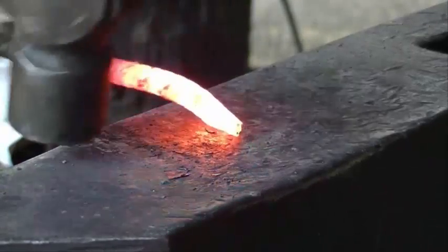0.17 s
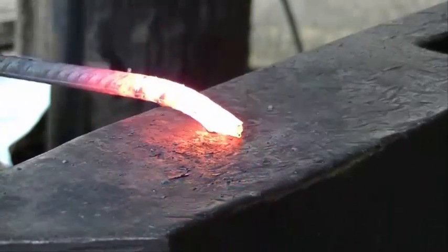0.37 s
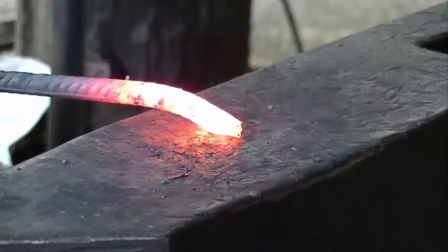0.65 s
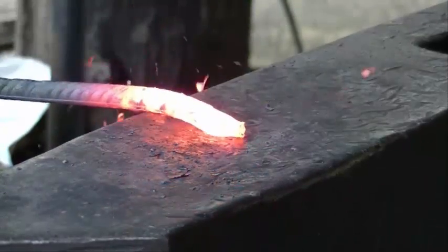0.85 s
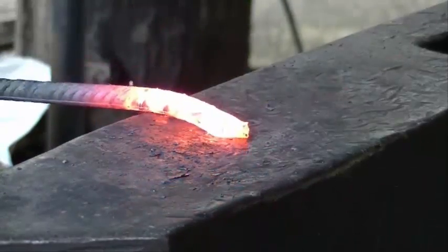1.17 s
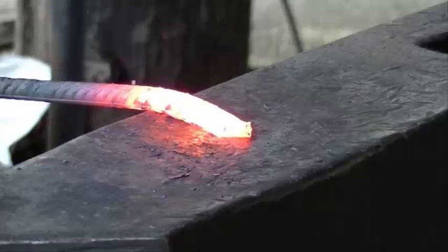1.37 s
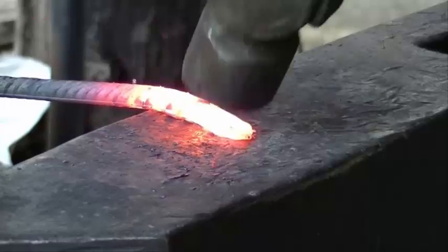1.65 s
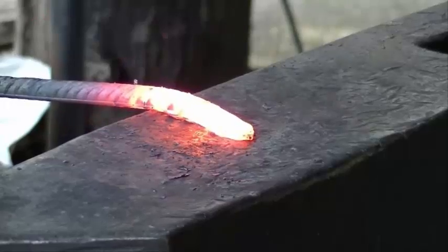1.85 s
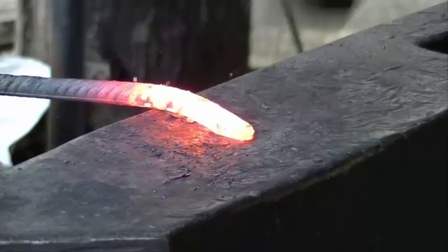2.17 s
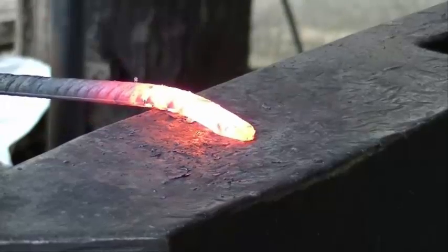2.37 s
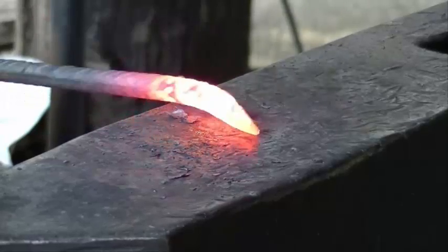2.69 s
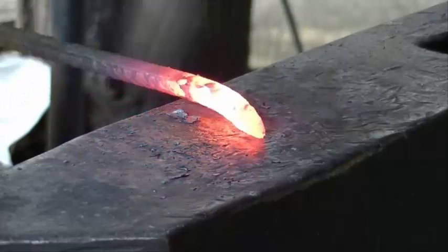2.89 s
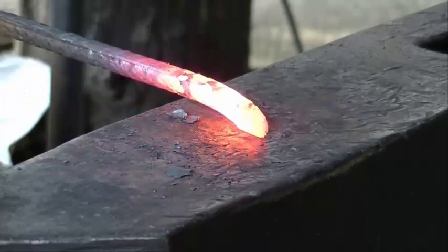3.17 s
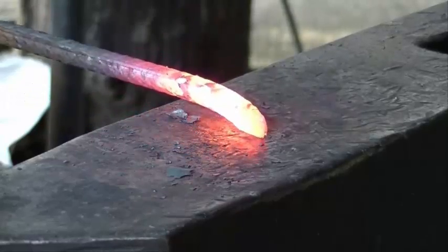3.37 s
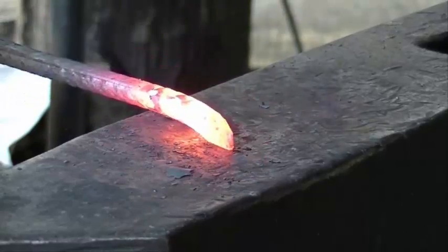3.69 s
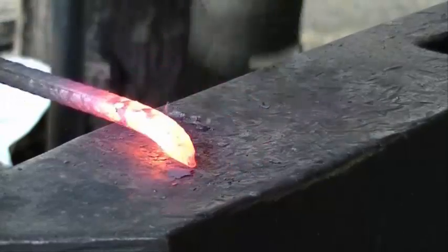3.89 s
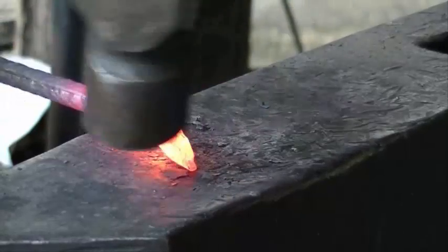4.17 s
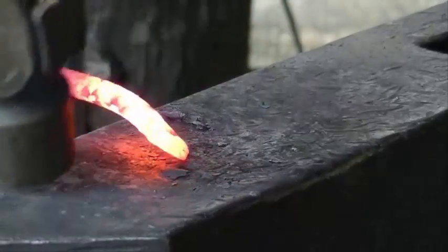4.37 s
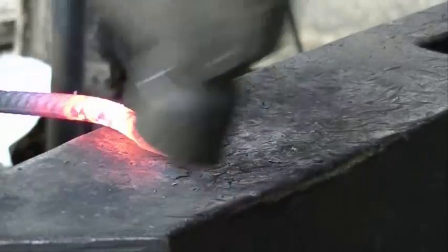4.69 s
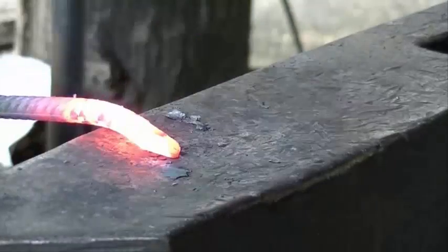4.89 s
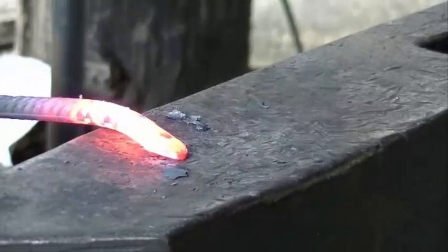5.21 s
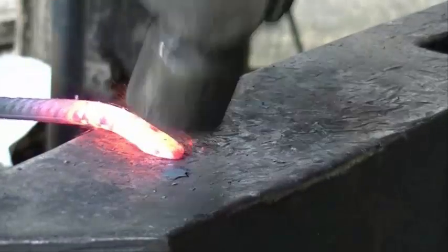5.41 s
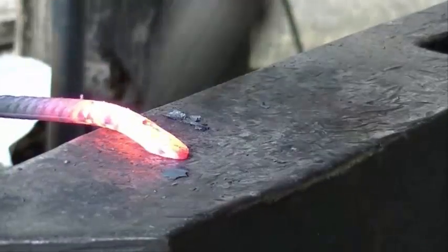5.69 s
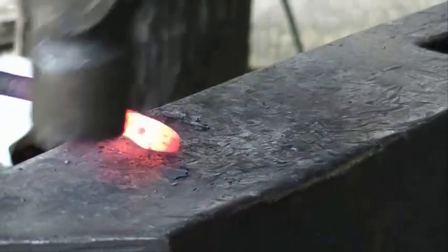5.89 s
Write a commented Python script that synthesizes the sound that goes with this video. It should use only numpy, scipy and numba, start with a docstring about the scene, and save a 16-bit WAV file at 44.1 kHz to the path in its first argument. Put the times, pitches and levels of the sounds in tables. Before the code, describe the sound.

Close to an anvil in a small forge, a hand hammer beats a hot steel bar. After two light taps come nine rhythmic blows, some dull and knocking, some sharp and bright, with brief metallic ringing and small clicks of the bar between them. The hammer chatters on the bare anvil, pauses, then strikes three more times and taps once. A low-level steady rush of fire runs underneath.

```python
"""Two light hammer taps ring on a bare anvil; then a smith draws out a red-hot bar in a small forge.
Each blow snaps, clanks and rings anvil and hammer. The bar clinks as it is turned, the hammer now and
then bounces on the bare face, and the blown fire rushes behind.
The stereo microphone stands close. Its limiter ducks on every hard snap and recovers as fast as the
clank dies, so those blows seem to hang."""
import sys
import numpy as np
from scipy import signal
from scipy.fft import rfft, irfft, next_fast_len
from scipy.io import wavfile
from numba import njit

SR = 44100
rng = np.random.default_rng(int(sys.argv[2]) if len(sys.argv) > 2 else 0)


def wav_record(signal):
    """Record a signal, one row per channel, as 16-bit PCM in the file named by sys.argv[1]."""
    frames = np.transpose(np.atleast_2d(signal))
    bounded = np.clip(frames, -1, 1)
    # unit amplitude maps onto the largest positive 16-bit level
    quanta = np.round(bounded * 32767).astype(np.int16)
    wavfile.write(sys.argv[1], SR, quanta)


N = 266805

# blows on the hot bar: start_s, force_db, softness (0-1), face_ring_db, hammer_ring_db
BAR_BLOWS = [ (0.7675, 10, 0.75, -14, -0.5), (1.218, 12.5, 0.58, -10.5, -0.5), (1.6643, 3.5, 0.84, -18, -3),
             (2.1124, 17, 0.19, -12, -3), (2.5525, 19, 0.22, -17, 3), (2.950, 15.5, 0, -4.5, -5.5),
             (3.435, 1.5, 1, -17, -35), (3.83, 0, 1, -14, -8.5), (4.1245, -3.5, 0.84, -26, -12),
             (5.0662, 18, 0.07, -9, -2.5), (5.4128, 6.5, .55, -9.5, -8.5), (5.7422, 5.5, .45, -22, -0.5)]
# the hammer bouncing on the bare face: start_s, force_db, heel_nearness (0-1), hammer_ring_db
FACE_TAPS = [(.158, -1, 0.18, -7), (.239, -6, 0, -17), (4.3009, -1.5, 0.93, 0), (4.383, -3.5, 0.8, -7.5),
             (4.4313, -5, 0.7, -12.5), (4.4654, -13, 0.8, -20), (4.4843, -12, 0, -20),
             (4.503, -31, 0.3, -16), (5.9707, -4, 0.86, -2)]
# short bright clicks, the bar touching the anvil and one hammer rebound just after a blow:
# start_s, level_db, t60_s
BRIGHT_CLICKS = [(0.511, -31.5, 0.15), (.648, -16, 0.03), (0.653, -17.5, 0.055), (1.033, -27, 0.26),
                 (1.072, -37, 0.043), (2.759, -29, 0.027), (3.189, -33.5, 0.053), (3.45, -7, 0.03)]
# modes of the anvil's body, heel and face, the hammer head and the hot bar: pitch_hz, level_db
BODY_MODES = [(937, -16), (1042, -14), (1396, -15), (1470, -15), (1690, -13), (1890, -13), (1911, -5),
              (2495, -21), (4365, -22)]
HEEL_MODES = [(2747, -9), (2815, -13), (3160, -6), (3190, -12), (3785, -17)]
FACE_MODES = [(4935, -12), (5497, -7), (5750, -10), (5860, -13), (6638, 0), (7343, -8), (7780, -14),
              (8905, -19), (9110, -20), (9440, -19)]
HAMMER_MODES = [(8204, -10), (8232, -6), (10500, -20)]
BAR_MODES = [(940, 5), (2810, 2.5), (3740, -1), (4350, -4), (5440, 2), (5630, 6), (6220, 4), (7300, -1),
             (9400, -1)]
# noise spectra of the clank, the bright clicks and the fire: frequency_hz, density_db
CLANK_SPECTRUM = [(30, -4.5), (160, -16), (380, -13.5), (620, 0), (950, 1.5), (1750, 10), (2700, 7),
                  (4100, 5.5), (5300, 4), (8100, -1), (11000, 1)]
CLICK_SPECTRUM = [(100, -3), (700, -1), (2000, 7.5), (3500, 3.5), (7000, 5.5), (11000, 2)]
FIRE_SPECTRUM = [(30, -11), (100, -30), (170, -17), (250, -12.5), (400, -5.5), (660, 0.5), (1100, -3.5),
                 (2000, -4.5), (2800, -9.5), (5000, -15), (11000, -25)]
# stereo width of room and fire at the microphone: frequency_hz, side_against_mid_db
ROOM_WIDTH = [(150, -13), (700, -25.5), (2500, -17), (5000, -14), (10000, -3)]
FIRE_WIDTH = [(100, -2), (250, -15), (1000, -21), (3000, -16), (6000, -7), (10000, -3)]

TOP_HZ = 10900  # treble cut-off
AGE = np.arange(SR // 3) / SR  # seconds since a contact


def bar_blow(force_db, softness, face_db, hammer_db):
    """A blow on the hot bar: soft steel thuds, knocks and sheds scale, and it damps the anvil."""
    return strike(
        force_db, face_db, hammer_db,
        kick_hz=2310 - 1240 * softness,  # longer contact lowers the pitch
        thud_db=4 + 11 * softness, knock_db=-2.5 + 12 * softness, bright_db=-6 + 7 * softness,
        body_db=2 - 4.5 * softness, heel_db=-11 - 6 * softness, bar_db=-15 + 12 * softness)


def face_tap(force_db, heel_nearness, hammer_db):
    """Hammer on bare anvil: the face rings with the hammer, and the thin heel sings when struck near."""
    return strike(
        force_db, face_db=hammer_db - 6, hammer_db=hammer_db, kick_hz=2310,
        thud_db=5.5, knock_db=7.5, bright_db=-16,
        body_db=3, heel_db=-4 + 12 * heel_nearness, bar_db=-np.inf)


def strike(force_db, face_db, hammer_db, kick_hz, thud_db, knock_db, bright_db,
           body_db, heel_db, bar_db):
    """Close by: the snap of the stopped hammer, then a diffuse clank with the clear rings of steel."""
    # soft hot steel passes a longer push to the anvil stand; crushed scale adds treble
    push = [(450, thud_db), (1100, knock_db), (2400, 0), (3900, 0)]
    snap_tone = [(200, 7.8)] + push + [(5700, bright_db / 2 - 0.5), (10000, bright_db / 2 - 6)]
    clank_tone = push + [(5300, bright_db)]
    cycles = kick_hz * AGE
    kick = undb(8.5) * cycles * np.exp(-cycles / 0.91) * np.sin(2 * np.pi * cycles)
    crack = undb(-5.5) * colour(wash(CLANK_SPECTRUM) * fade(t60_s=0.05), snap_tone)
    # the hammer head rings hardest in the first moment
    ping = undb(hammer_db + 1.5) * ring(HAMMER_MODES, t60_s=0.042, spread=0.19)
    # crowded modes merge with the wall reflections
    partials = undb(-21) * ring(crowded_modes(), t60_s=0.18, spread=0.75)
    clank = colour(wash(CLANK_SPECTRUM) * fade(t60_s=0.19) + partials, clank_tone)
    anvil = (undb(body_db) * ring(BODY_MODES, t60_s=0.19, spread=0.8)
             + undb(heel_db) * ring(HEEL_MODES, t60_s=0.16, spread=0.5)
             + undb(face_db) * ring(FACE_MODES, t60_s=0.21, spread=0.5))
    bar = undb(bar_db) * ring(BAR_MODES, t60_s=0.075, spread=0.7)
    hammer = undb(hammer_db) * ring(HAMMER_MODES, t60_s=0.18, spread=0.4)
    clank_db = -14 + 0.8 * force_db  # grows more slowly with force than the snap
    return undb(force_db) * (kick + crack + ping) + undb(clank_db) * (clank + anvil + bar + hammer)


def ring(modes, t60_s, spread):
    """Decaying modes, a little different at each blow; high ones reach left and right out of step."""
    out = 0
    for (hz, db), (jitter_db, phase, lag) in zip(modes, rng.standard_normal((len(modes), 3))):
        angle = 2 * np.pi * hz * AGE + np.pi * phase
        side = spread * hz / TOP_HZ * np.sign(lag) * np.cos(angle)
        out = out + undb(db + jitter_db) * stereo(np.sin(angle), side)
    return out * fade(t60_s)


def crowded_modes(count=40, slope_db_per_octave=-2):
    """The many weak upper modes of anvil and bar; each spot that is struck wakes others."""
    return [(hz, slope_db_per_octave * np.log2(hz / TOP_HZ)) for hz in rng.uniform(1300, TOP_HZ, count)]


def bright_click(t60_s, grit_db=4, echo_db=-15, echo_t60_s=0.21):
    """A gritty click as the bar touches the anvil or the hammer rebounds; the forge walls answer."""
    grains = np.repeat(rng.standard_normal(len(AGE)), SR // 1000)[:len(AGE)]  # about 1 ms each
    click = unit(undb(grit_db * grains) * wash(CLICK_SPECTRUM)) * fade(t60_s)
    echo = undb(echo_db) * wash(CLICK_SPECTRUM) * fade(echo_t60_s)
    return click + echo


def fire(level_db=-36.5, flutter_hz=14, whine_db=-17):
    """The blown fire behind the anvil: a steady rush, a slight flutter and a faint blower whine."""
    smoothing = signal.butter(2, flutter_hz, fs=SR, output="sos")
    flutter = unit(signal.sosfilt(smoothing, rng.standard_normal(N)))
    whine = wash([(1850, -70), (1950, 0), (2050, -70)], size=N)
    rush = wash(FIRE_SPECTRUM, FIRE_WIDTH, size=N)
    return (rush + undb(whine_db) * whine) * undb(level_db + 0.5 * flutter)


def wash(spectrum, width=ROOM_WIDTH, size=len(AGE)):
    """Diffuse coloured stereo noise, rms near 1."""
    mid, side = unit(colour(rng.standard_normal((2, size)), spectrum))
    return stereo(mid, colour(side, width))


def colour(x, spectrum):
    """Filter by a curve of (frequency_hz, gain_db) points."""
    hz, db = np.transpose(spectrum)
    size = next_fast_len(x.shape[-1] + SR // 10)  # room for the filter to ring out
    bin_hz = np.maximum(np.fft.rfftfreq(size, 1 / SR), 1)
    gain = undb(np.interp(np.log(bin_hz), np.log(hz), db))
    return irfft(rfft(x, size) * gain, size)[..., :x.shape[-1]]


def fade(t60_s):
    """Exponential decay, 60 dB down after t60_s."""
    return np.exp(-np.log(1000) * AGE / max(t60_s, 1e-4))


def undb(db):
    """Decibels to gain."""
    return 10 ** (np.asarray(db) / 20)


def unit(x):
    """Scale to rms 1."""
    return x / np.sqrt(np.mean(x ** 2))


def stereo(mid, side):
    """Left and right from mid and side."""
    return np.array([mid + side, mid - side])


def add(track, start_s, sound):
    """Mix a stereo sound into a track."""
    start = int(start_s * SR)
    track[:, start:start + len(AGE)] += sound[:, :max(N - start, 0)]


@njit
def follow_peaks(x, attack, release):
    """The limiter's detector: rises fast, falls at a steady rate in dB."""
    out, peak = np.empty(len(x)), 1e-6
    for i in range(len(x)):
        peak = peak + (x[i] - peak) * attack if x[i] > peak else peak * release
        out[i] = peak
    return out


def scene():
    """The forge from beside the anvil: blows, taps and clicks in front, the fire behind."""
    forge = fire()
    for start_s, force_db, softness, face_db, hammer_db in BAR_BLOWS:
        add(forge, start_s, bar_blow(force_db, softness, face_db, hammer_db))
    for start_s, force_db, heel_nearness, hammer_db in FACE_TAPS:
        add(forge, start_s, face_tap(force_db, heel_nearness, hammer_db))
    for start_s, level_db, t60_s in BRIGHT_CLICKS:
        add(forge, start_s, undb(level_db) * bright_click(t60_s))
    return forge


def record(dry, limit_db=-3, attack_s=0.0001, recovery_db_per_s=350, low_cut_hz=170):
    """The close microphone's chain: bass cut, fast limiter whose overshoot clips, treble cut-off."""
    bass_cut = signal.sosfilt(signal.butter(1, low_cut_hz, "high", fs=SR, output="sos"), dry)
    attack = 1 - np.exp(-1 / (attack_s * SR))
    release = float(undb(-recovery_db_per_s / SR))
    peak = follow_peaks(np.abs(bass_cut).max(axis=0), attack, release)
    duck = np.minimum(1, undb(limit_db) / peak)
    limited = np.clip(bass_cut * duck, -1, 1)
    return signal.sosfilt(signal.ellip(10, 0.2, 70, TOP_HZ, fs=SR, output="sos"), limited)


dry = scene()
out = record(dry)
wav_record(out)
```